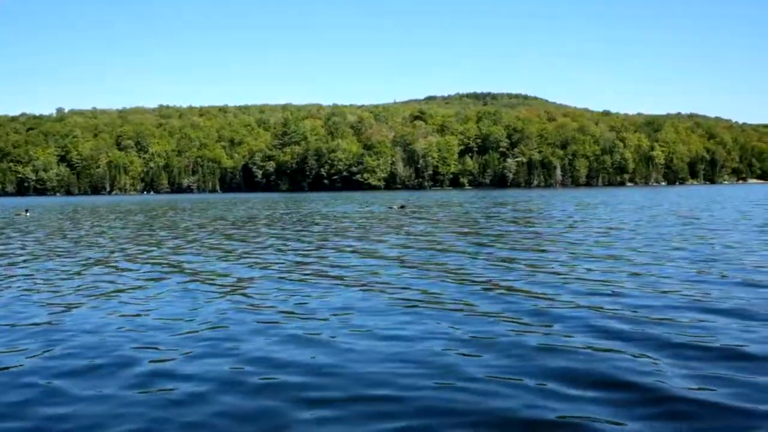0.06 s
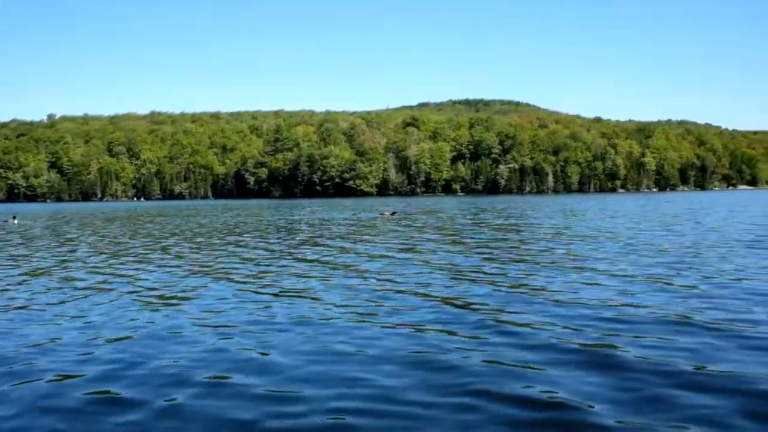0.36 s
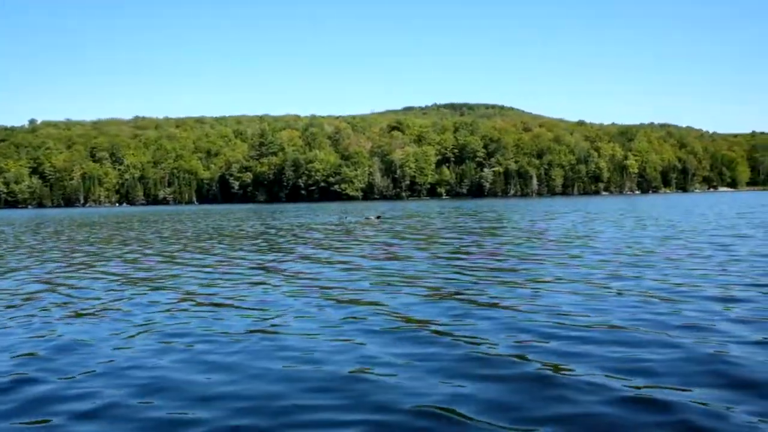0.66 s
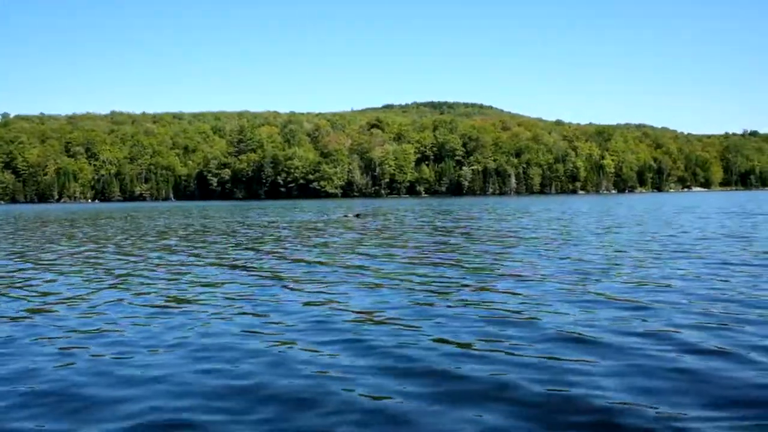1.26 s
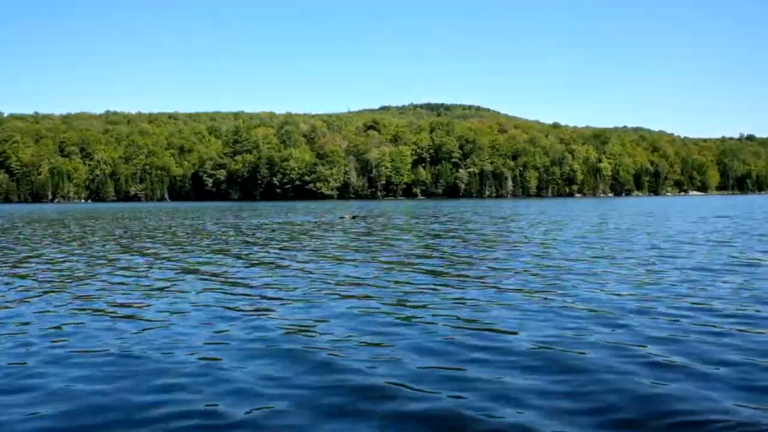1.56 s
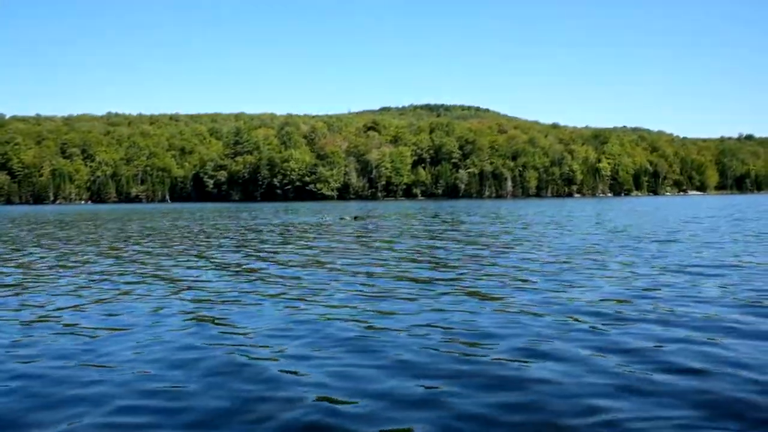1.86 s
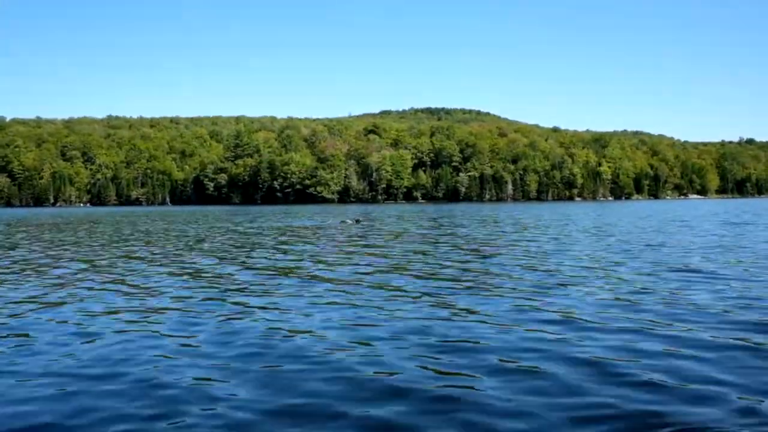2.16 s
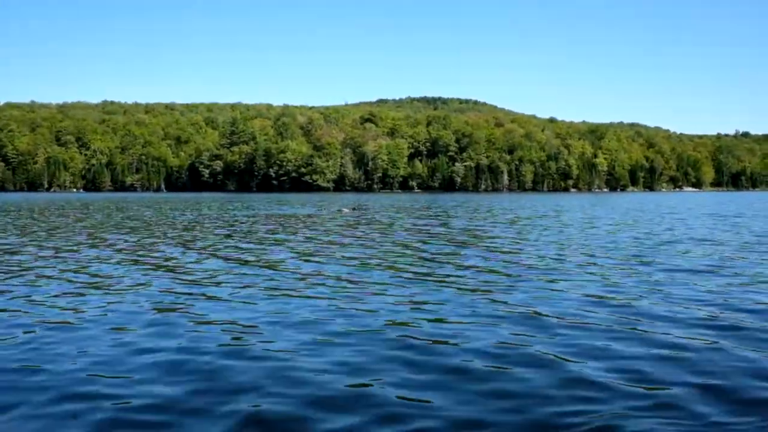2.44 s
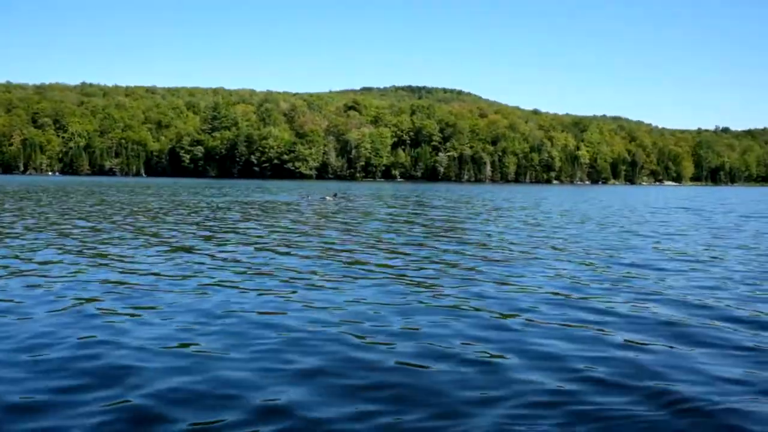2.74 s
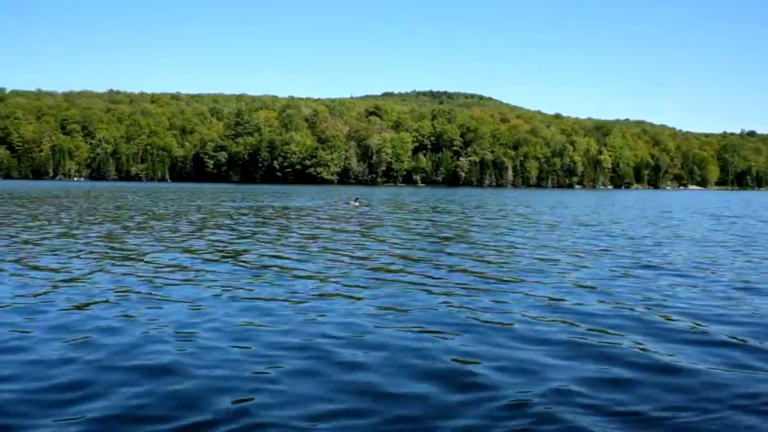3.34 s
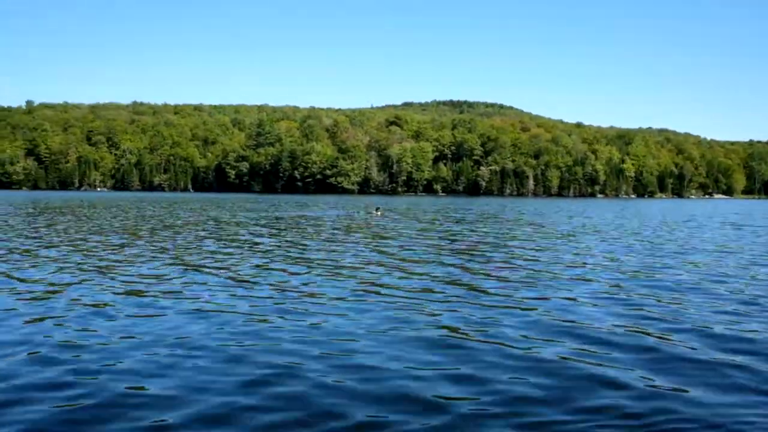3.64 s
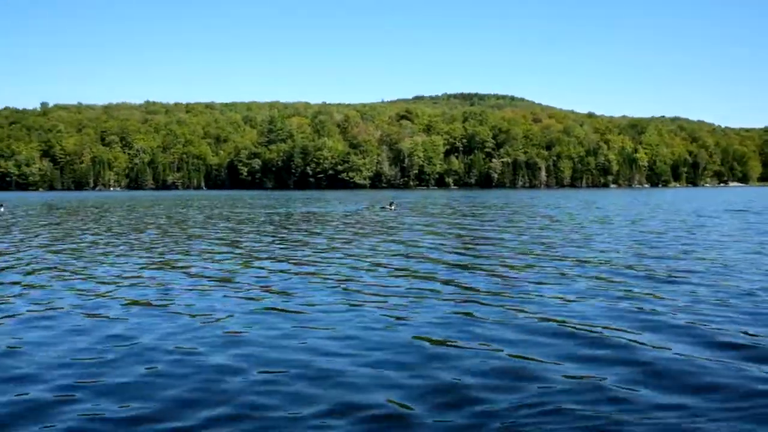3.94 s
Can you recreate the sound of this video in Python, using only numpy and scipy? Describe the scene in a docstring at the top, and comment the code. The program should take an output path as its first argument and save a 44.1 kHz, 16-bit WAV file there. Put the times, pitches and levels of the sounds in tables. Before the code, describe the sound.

A distant loon wails four times across a lake while water laps softly against a boat.

```python
"""A quiet lake, the microphone close to a small boat. From the first moment a loon yodels across the
water: a clear, high wail steps down through two low registers and breaks upward again. After a short
pause come two more wails, while nearby ripples lap, plop and thump against the hull. The bird stops
at 2.4 s and two air pockets gulp under the boat. What remains is the long, faint echo of the wooded
shore, with the soft lapping, occasional ticks and faint low hum that run throughout."""
import sys
import numpy as np
from scipy import signal
from scipy.fft import rfft, irfft, next_fast_len
from scipy.io import wavfile
from scipy.ndimage import uniform_filter1d, map_coordinates

SR = 44100
rng = np.random.default_rng(int(sys.argv[2]) if len(sys.argv) > 2 else 0)


def unload_wav(signal):
    """Save mono or channel-first audio to the path in sys.argv[1] as 16-bit WAV at rate SR, clipped to [-1, 1]."""
    wavfile.write(
        sys.argv[1],
        SR,
        np.round(np.clip(np.atleast_2d(signal).T, -1, 1) * 32767).astype(np.int16),
    )


N = 176400

# The fundamental of each high wail: (time [s], pitch [Hz], level [dB])
OPENING_WAIL = [(0, 1577, -14), (.037, 1470, -22.5), (.047, 1355, -18), (.11, 1308, -21.5),
                (.135, 1280, -25.5), (.148, 1285, -25.5)]
SECOND_WAIL = [(.331, 1545, -17.5), (.36, 1568, -15.5), (.405, 1585, -15), (.53, 1550, -17.5),
               (.61, 1547, -17.5), (.73, 1589, -14.5), (.82, 1641, -16.5), (.86, 1653, -15.5),
               (.893, 1630, -17.5)]
FALLING_WAIL = [(1.283, 1564, -16), (1.315, 1576, -14.5), (1.365, 1596, -14.5), (1.44, 1586, -16),
                (1.5, 1552, -19), (1.555, 1473, -21.5), (1.569, 1340, -20), (1.62, 1280, -24),
                (1.655, 1232, -26.5)]
LAST_WAIL = [(1.831, 1527, -20.5), (1.86, 1545, -18.5), (1.905, 1561, -16), (2.03, 1525, -20),
             (2.13, 1519, -20.5), (2.21, 1555, -17.5), (2.31, 1607, -15.5), (2.36, 1626, -17.5),
             (2.394, 1585, -17)]
# The colour of each wail: (time [s], levels of harmonics 2, 3, 4 and 5 [dB])
OPENING_COLOUR = [(0.01, -35, -53, -45, -52.5), (0.1, -52, -44, -59.5, -64),
                  (0.139, -47.5, -54.5, -78, -71.5)]
SECOND_COLOUR = [(0.344, -38, -44.5, -52, -54), (.43, -44, -41.5, -57, -61.5),
                 (0.559, -40, -51, -44.5, -55), (.72, -40, -42.5, -53.5, -66.5),
                 (0.799, -37, -48, -56.5, -55), (.88, -29.5, -44.5, -51.5, -56.5)]
FALLING_COLOUR = [(1.295, -37.5, -55, -47.5, -57.5), (1.457, -38.5, -59, -45, -61.5),
                  (1.58, -43, -50, -50, -63), (1.64, -57.5, -61.5, -75.5, -80)]
LAST_COLOUR = [(1.845, -43.5, -45.5, -53, -65.5), (1.91, -43.5, -48.5, -62.5, -53.5),
               (2.02, -48, -50.5, -54.5, -70), (2.17, -43.5, -47.5, -64, -74), (2.28, -39, -53.5, -59, -66),
               (2.38, -33, -56, -62.5, -69.5)]
# Harmonics 6 to 10, before a wail's edge_db is added: (level against the fifth [dB])
TOP_HARMONICS = [-3, -16, -22, -28, -30.5]
# Low-register glides:
# (time [s], length [s], start pitch [Hz], end pitch [Hz], start level [dB], end level [dB])
LOW_NOTES = [(0.149, 0.096, 913, 826, -33, -50.5), (0.236, 0.067, 558, 540, -43, -36),
             (0.295, 0.013, 552.5, 664, -33.5, -32), (0.308, 0.02, 863, 1019, -35.5, -20.5),
             (0.894, .014, 1072, 940, -19, -41), (1.241, 0.019, 565.4, 719, -36, -26),
             (1.261, 0.021, 939, 1022, -24.5, -21.5), (1.653, 0.079, 897, 826, -32.5, -44.5),
             (1.735, 0.076, 543.5, 535, -41, -40), (1.797, 0.0084, 558, 660, -36, -33),
             (1.806, .023, 837, 1008, -37.5, -26), (2.394, 0.0098, 1050, 943, -23, -37)]
# Resonances of the bird's throat: (frequency [Hz], gain [dB])
THROAT = [(550, 13.5), (900, 1), (1200, 13.5), (1800, -7.5), (2800, -12), (3900, -11), (5000, -16.5),
          (8000, -26.5), (16000, -57.5)]
# Waves striking the hull: (time [s], relative level [dB])
THUMPS = [(0.288, -39), (.296, -20.5), (0.759, -34), (0.767, -25), (1.541, -45), (1.59, -41)]
# Short ticks: small contacts on the boat, and the click at the start of the loon's low note at 1.25 s:
# (time [s], relative level [dB], brightness [dB/octave])
TICKS = [(0.614, -33.5, -3), (.702, -42, -14), (1.042, -32, 1.5), (1.1087, -34, 10.5), (1.119, -40, 5.5),
         (1.1531, -38.5, -1.5), (1.249, -39, -12.5), (1.628, -41, 6.5), (2.756, -44.5, 8.5),
         (3.0809, -31.5, 7), (3.136, -39.5, 5), (3.496, -43, 6.5)]
# The ring of the hull and of a tick: (frequency [Hz], relative level [dB], t60 [s])
HULL_MODES = [(124, -7.5, 0.027), (180, -3, 0.097), (251, 5.5, 0.083), (348, -5.5, 0.077)]
TICK_MODES = [(1304, 0.5, 0.025), (2180, -4.5, 0.018), (2525, -11, 0.02), (3560, -3.5, 0.0056),
              (5290, -7, 0.004)]
# Big bubbles by the hull: (time [s], relative level [dB], start pitch [Hz])
PLOPS = [(0.701, -45, 794), (1.013, -45, 959), (1.111, -48, 886), (1.17, -51, 789), (1.893, -42, 730)]
# Air pockets under the hull: (time [s], relative level [dB], start pitch [Hz], length [s])
GULPS = [(2.449, -43, 720, 0.044), (2.567, -39.5, 218, 0.062)]
# Water working against the boat: (time [s], strength [dB])
LAPPING = [(0, -70), (.45, -71.5), (.7, -60.5), (.92, -62.5), (1.02, -56.5), (1.2, -64), (1.6, -58.5),
           (2.4, -66.5), (3.21, -73), (3.27, -71), (3.36, -78.5), (4, -75)]
# Noise colours of slosh, wash, fizz and the white noise of the echo: (frequency [Hz], gain [dB])
SLOSH_SPECTRUM = [(40, -42.5), (120, -10.5), (240, -4), (420, -20), (9000, -90)]
WASH_SPECTRUM = [(25, -31), (65, -8), (130, -2.5), (300, 0.5), (800, -8.5), (1900, -14.5), (5500, -23.5),
                 (15000, -34)]
FIZZ_SPECTRUM = [(300, -8.5), (950, 0), (1700, -3), (5000, -13.5), (15000, -51.5)]
FLAT_SPECTRUM = [(1000, 0)]
# Likeness of diffuse sound left and right of the microphone: (frequency [Hz], correlation [0-1])
STEREO_LIKENESS = [(60, 0.57), (900, 0.71), (4000, 0.79), (12000, 0.16)]
# Tones of the hum: (frequency [Hz], level [dB])
HUM_TONES = [(66.5, -64.5), (134.5, -62.5), (490, -66.5)]

BREAK_S = 0.0039  # time a register takes to start or stop
SCOOP_S, CURL_S = 0.008, 0.0074  # a wail slides up into its pitch and curls down out of it
STEP_HZ_PER_S = 10000  # a pitch step this fast counts as a register break
TREBLE_HZ, TREBLE_RISING_DB, TREBLE_FALLING_DB = 2420, -4, -14.5
ECHO_DB, ECHO_T60_S, ECHO_DELAY_S, ECHO_DULL_HZ = -31.5, 10.4, 0.01, 1940
LINGER_DB, LINGER_HZ, LINGER_WIDTH_HZ = -48.5, 1605, 87
THUMP_RISE_S, HULL_LOW_HZ, SLOSH_DB = 0.0034, 95, -13
TICK_LOW_HZ, TICK_HIGH_HZ, CRACK_DB = 694, 14000, -16.5
BUBBLES_PER_S, BUBBLE_HZ, SPRAY_PER_S, SPRAY_HZ = 360, 1131.5, 150, 3200
WASH_DB, FIZZ_DB = -56, 5.5
TOP_HZ = 15800


def loon():
    """The bird out on the lake: four high wails, with low notes at the breaks."""
    return (wail(OPENING_WAIL, OPENING_COLOUR, edge_db=-13)
            + wail(SECOND_WAIL, SECOND_COLOUR, edge_db=1)
            + wail(FALLING_WAIL, FALLING_COLOUR, edge_db=-6.5)
            + wail(LAST_WAIL, LAST_COLOUR, edge_db=0)
            + low_notes())


def wail(contour, colour, edge_db):
    """High register: a nearly pure tone; weak overtones flutter over the ripples and sag at breaks."""
    t, start, end = clock(), contour[0][0], contour[-1][0]
    hz, level_db = curves(contour)
    envelope = gate(t, start, end)
    sounding = envelope > 0
    # Near a break the voice goes flat, rough, dull and quiet.
    scoop = np.exp(-abs(t - start) / SCOOP_S) * (start > BREAK_S * 2)
    slack = scoop + np.exp(-abs(t - end) / CURL_S)
    glide_hz_per_s = uniform_filter1d(abs(np.gradient(hz)), size=300) * SR
    dull_db = -6.5 * (slack + np.minimum(glide_hz_per_s / STEP_HZ_PER_S, 1))
    jitter = 0.0017 * wobble(120) + 0.021 * slack * wobble(600)
    hz = uniform_filter1d(hz, size=200) * (1 - 0.08 * slack) * (1 + jitter)
    phase = 2 * np.pi * np.cumsum(hz[sounding]) / SR
    lower_db = curves(colour)
    upper_db = [lower_db[-1] + edge_db + db + 3 * wobble(9) for db in TOP_HARMONICS]
    harmonics_db = [level_db + 0.32 * wobble(56)]
    harmonics_db += [db + dull_db + 1.5 * wobble(42) for db in lower_db + upper_db]
    voice = np.zeros(N)
    voice[sounding] = sum(amp(db[sounding]) * np.sin(k * phase) for k, db in enumerate(harmonics_db, 1))
    return np.sqrt(2) * amp(-6 * slack) * envelope * voice


def low_notes():
    """Two lower registers: reedy glides shaped by the throat; upward ones are pressed and brighter."""
    voice, t = np.zeros(N), np.arange(SR // 8) / SR - BREAK_S
    harmonic = np.arange(1, 15)[:, None]
    for start, length, start_hz, end_hz, start_db, end_db in LOW_NOTES:
        progress = np.clip(t / length, 0, 1)
        hz = (start_hz + (end_hz - start_hz) * progress) * (1 + 0.012 * wobble(500)[:len(t)])
        phase = 2 * np.pi * np.cumsum(hz) / SR
        treble_db = TREBLE_RISING_DB if end_hz > start_hz else TREBLE_FALLING_DB
        colour_db = along(THROAT, harmonic * hz) - along(THROAT, hz)
        colour_db += treble_db * (harmonic * hz > TREBLE_HZ)
        tone = np.sqrt(2) * np.sum(amp(colour_db) * np.sin(harmonic * phase), axis=0)
        envelope = amp(start_db + (end_db - start_db) * progress) * gate(t, 0, length)
        add(voice, start - BREAK_S, tone * envelope)
    return voice


def shore_echo(voice):
    """The wooded shore returns a diffuse echo, dulled by distance; earlier calls still linger in it."""
    decay = fade(clock(), ECHO_T60_S)
    lingering = filtered(noise(FLAT_SPECTRUM),
                         lambda hz: np.exp(-((hz - LINGER_HZ) / LINGER_WIDTH_HZ) ** 2))
    tail = noise(FLAT_SPECTRUM) * decay * (clock() > ECHO_DELAY_S)
    echo = signal.fftconvolve(voice[None], tail / np.linalg.norm(tail[0]), axes=1)[:, :N]
    echo = filtered(echo, lambda hz: 1 / np.sqrt(1 + (hz / ECHO_DULL_HZ) ** 6))
    return amp(ECHO_DB) * echo + amp(LINGER_DB) * unit(lingering) * decay


def thumps():
    """Close to the microphone, waves slap the hull, which booms briefly while the water sloshes."""
    hull, slosh, t = np.zeros(N), np.zeros(N), np.arange(SR // 2) / SR
    rise = 1 - np.exp(-t / THUMP_RISE_S)
    for start, db in THUMPS:
        add(hull, start, amp(db) * rise * ring(HULL_MODES, t, detune=0.037))
        add(slosh, start, amp(db + SLOSH_DB) * rise * fade(t, t60=0.29))
    hull = filtered(hull, lambda hz: 1 - np.exp(-(hz / HULL_LOW_HZ) ** 2))
    return panned(hull + slosh * noise(SLOSH_SPECTRUM), left_db=0.1)


def ticks():
    """A crack and a very short ring: the boat ticking, and one click as a low loon note begins."""
    track, t = np.zeros(N), np.arange(SR // 20) / SR
    for start, db, brightness in TICKS:
        crack = amp(CRACK_DB + brightness) * fade(t, t60=0.0056) * rng.standard_normal(len(t))
        ringing = ring(TICK_MODES, t, detune=0.084, db_per_octave=brightness)
        add(track, start, amp(db + 4) * (ringing + crack))
    track = filtered(track, lambda hz: hz / (hz - 1j * TICK_LOW_HZ) / (1 + (hz / TICK_HIGH_HZ) ** 4))
    return panned(track, left_db=2.0)


def plops():
    """A few big bubbles plop beside the hull."""
    track = np.zeros(N)
    for start, db, hz in PLOPS:
        add(track, start, amp(db + 11.5) * bubble(hz, periods=25))
    return track


def gulps():
    """Air pockets swell out from under the hull, each curling up an octave as it nears the surface."""
    track = np.zeros(N)
    for start, db, hz, length in GULPS:
        progress = np.linspace(0, 1, int(length * SR))
        phase = 2 * np.pi * np.cumsum(hz * (1 + progress ** 2)) / SR
        envelope = np.sin(np.pi * progress) * (1 - progress / 2)
        add(track, start, amp(db) * envelope * np.sin(phase))
    return track


def water(lapping_db):
    """At the waterline, lapping drives a soft wash, a fizz and tiny bubbles among plops and gulps."""
    surge_db = lapping_db - lapping_db[-SR:].mean()  # against the calm last second
    wash = amp(WASH_DB + 0.2 * surge_db) * noise(WASH_SPECTRUM)
    fizz = amp(FIZZ_DB + lapping_db + 1.2 * wobble(22)) * noise(FIZZ_SPECTRUM)
    return wash + panned(fizz + plops() + gulps() + tiny_bubbles(lapping_db), left_db=1.2)


def tiny_bubbles(lapping_db):
    """A stream of small bubbles rings at scattered pitches, louder with each lap."""
    track = np.zeros(N)
    for when, pitch, faintness in rng.random((int(BUBBLES_PER_S * N / SR), 3)):
        hz = np.clip(BUBBLE_HZ * (pitch / (1 - pitch)) ** 0.2295, 550, 4200)
        db = lapping_db[int(when * N)] + 7 - 3.5 * np.log(faintness + 0.048)
        add(track, when * N / SR, amp(db) * bubble(hz, periods=30.2))
    return track


def spray(lapping_db):
    """Tiny droplets and bursting bubbles crackle softly as the water laps."""
    track = np.zeros(N)
    for when, pitch, faintness in rng.random((int(SPRAY_PER_S * N / SR), 3)):
        hz = min(SPRAY_HZ * (pitch / (1 - pitch)) ** 0.165, TOP_HZ)
        db = lapping_db[int(when * N)] + 3.5 - 4 * np.log(faintness + 0.041)
        add(track, when * N / SR, amp(db) * bubble(hz, periods=10))
    return track


def bubble(hz, periods):
    """One bubble starts softly, rises in pitch and dies within so many periods of its start pitch."""
    progress = np.linspace(0, 1, int(SR * periods / hz))
    phase = 2 * np.pi * periods * (progress + 0.2 * progress ** 2)
    attack = 1 - np.exp(-progress / 0.047)
    return 3 * attack * fade(progress, 0.96) * np.sin(phase)


def hum():
    """In the background, three faint low tones waver slightly in pitch."""
    return sum(np.sqrt(2) * amp(db) * np.sin(2 * np.pi * hz * clock() + 0.27 * wobble(35))
               for hz, db in HUM_TONES)


def ring(modes, t, detune, db_per_octave=0):
    """Damped modes, a little different every time."""
    centre_hz = np.mean([mode[0] for mode in modes])
    sound = np.zeros(len(t))
    for hz, db, t60 in modes:
        gain = amp(db + db_per_octave * np.log2(hz / centre_hz) + rng.normal(0, 1))
        detuned_hz = hz * (1 + detune * rng.normal())
        sound += gain * fade(t, t60) * np.sin(2 * np.pi * detuned_hz * t)
    return sound


def noise(spectrum):
    """Diffuse stereo noise of rms 1 with the given colour."""
    def mid_side_gains(hz):
        angle = np.arccos(np.clip(along(STEREO_LIKENESS, hz), -1, 1)) / 2
        return amp(along(spectrum, hz)) * [np.cos(angle), np.sin(angle)]
    mid, side = filtered(rng.standard_normal((2, N)), mid_side_gains)
    return unit(np.array([mid + side, mid - side]))


def wobble(knots_per_s):
    """A smooth random curve."""
    knots = rng.standard_normal(4000)
    coarse = np.arange(0, N + 16, 16)
    curve = map_coordinates(knots, [coarse * knots_per_s / SR], mode="wrap")
    return np.interp(np.arange(N), coarse, curve)


def gate(t, start, end):
    """Opens at start and closes at end, as fast as the voice breaks."""
    return np.clip((t - start) / BREAK_S + .5, 0, 1) * np.clip((end - t) / BREAK_S + .5, 0, 1)


def fade(t, t60):
    """A decay of 60 dB in every t60."""
    return np.exp(-np.log(1000) * t / t60)


def filtered(x, response):
    """x shaped by a gain that depends on frequency."""
    size = next_fast_len(N + SR // 2)
    return irfft(rfft(x, size) * response(np.fft.rfftfreq(size, 1 / SR)), size)[..., :N]


def curves(rows):
    """One value per sample for each column after the time."""
    times, *columns = np.transpose(rows)
    return [np.interp(clock(), times, column) for column in columns]


def along(points, hz):
    """(frequency [Hz], value) points read on a log axis."""
    frequencies, values = np.transpose(points)
    return np.interp(np.log(hz + 1), np.log(frequencies + 1), values)


def add(track, start_s, sound):
    """Mix a sound into a track."""
    part = track[max(round(start_s * SR), 0):][:len(sound)]
    part += sound[:len(part)]


def panned(x, left_db):
    """Stereo, raised on the left and lowered as much on the right."""
    return x * amp([[left_db], [-left_db]])


def amp(db):
    """Decibels to gain."""
    return 10 ** (np.asarray(db) / 20)


def unit(x):
    """Scaled to rms 1."""
    return x / np.sqrt(np.mean(x ** 2) + 1e-20)


def clock():
    """The time of every sample."""
    return np.arange(N) / SR


def scene():
    """The lake from the microphone: the bird far off and slightly left, the boat and water close by."""
    lapping_db = curves(LAPPING)[0] + 2 * wobble(9)  # the water comes in separate laps
    voice = loon()
    bird = panned(voice, left_db=1.8) + shore_echo(voice)
    return bird + thumps() + ticks() + water(lapping_db) + spray(lapping_db) + hum()


def record(dry):
    """The microphone chain keeps nothing above its band limit."""
    return filtered(dry, lambda hz: hz < TOP_HZ)


dry = scene()
out = record(dry)
unload_wav(out)
```